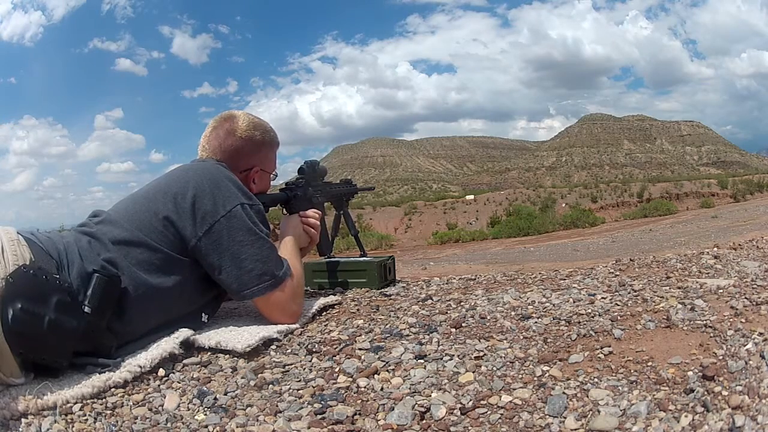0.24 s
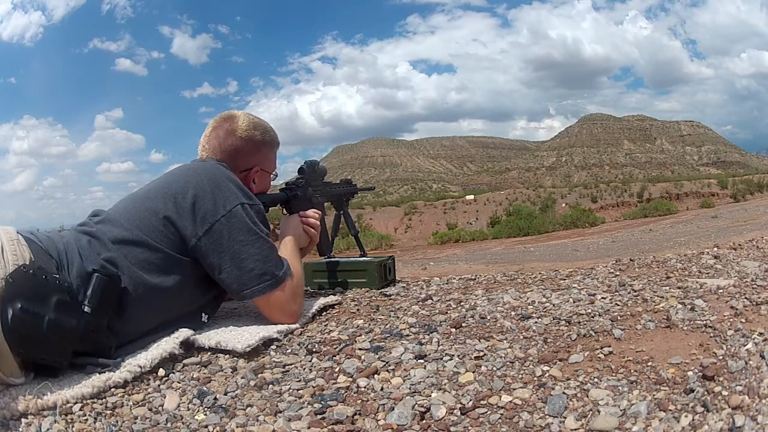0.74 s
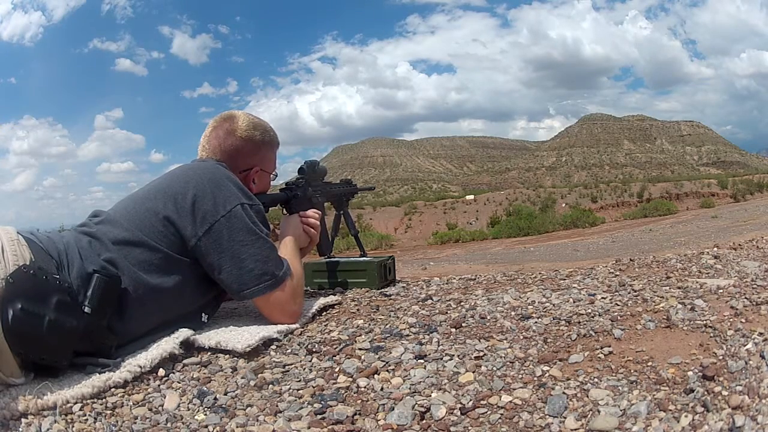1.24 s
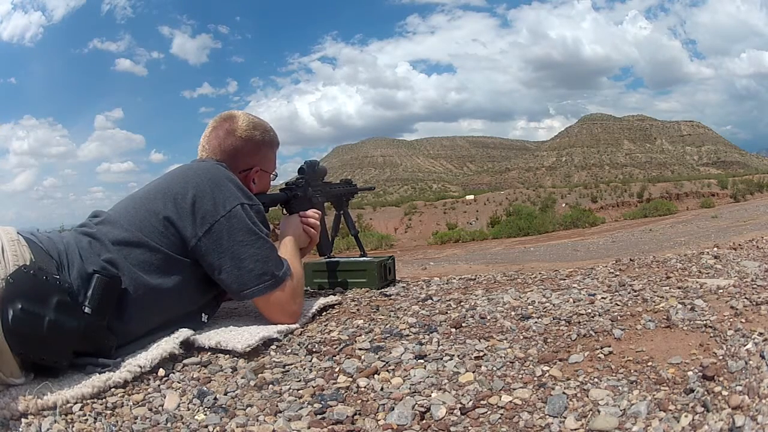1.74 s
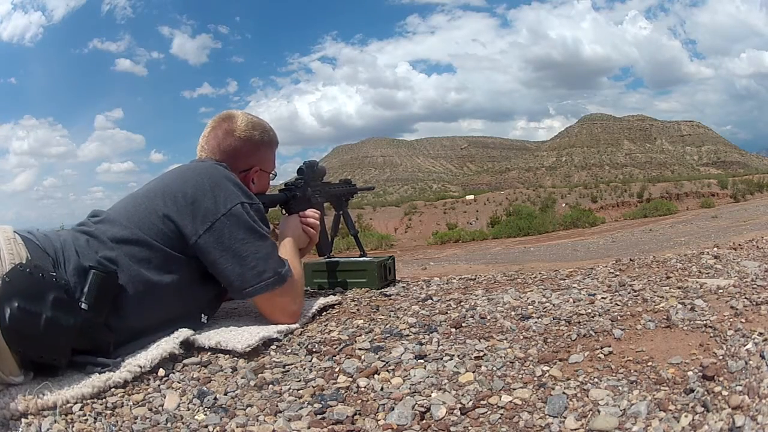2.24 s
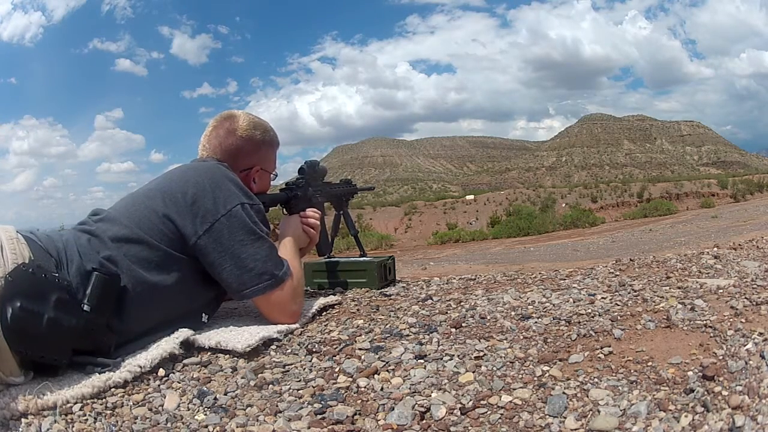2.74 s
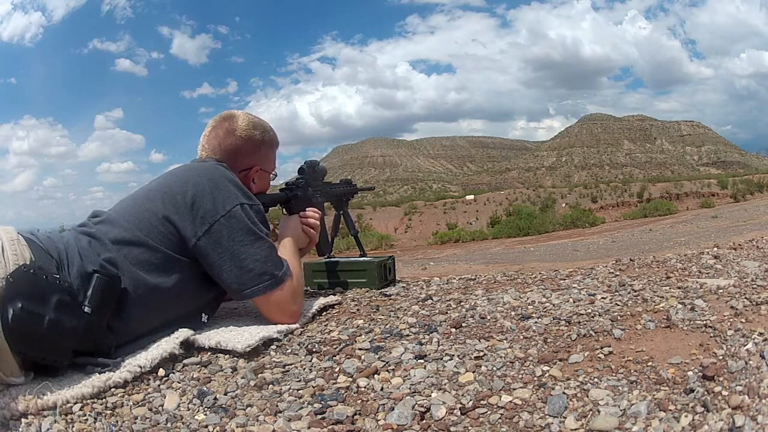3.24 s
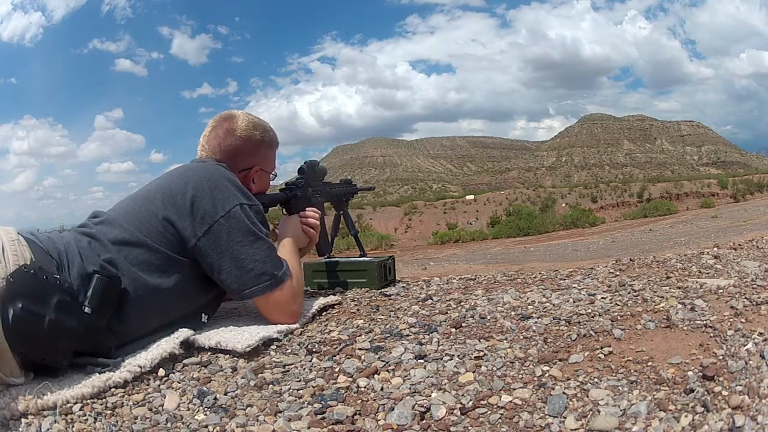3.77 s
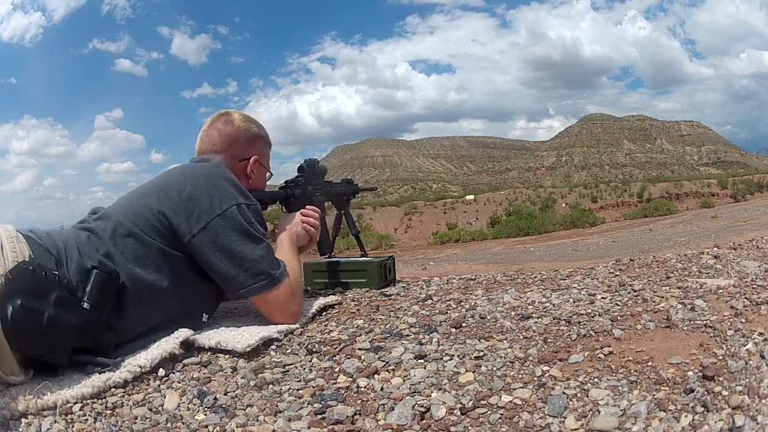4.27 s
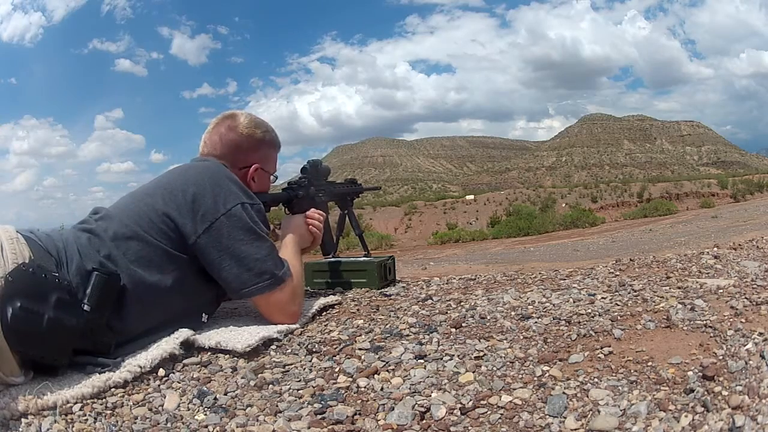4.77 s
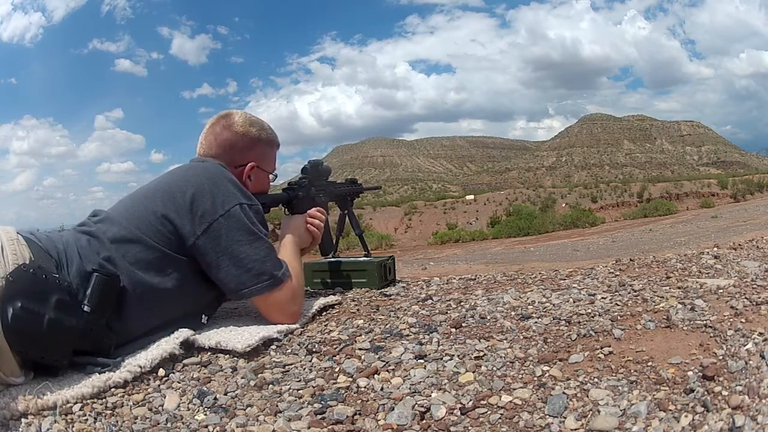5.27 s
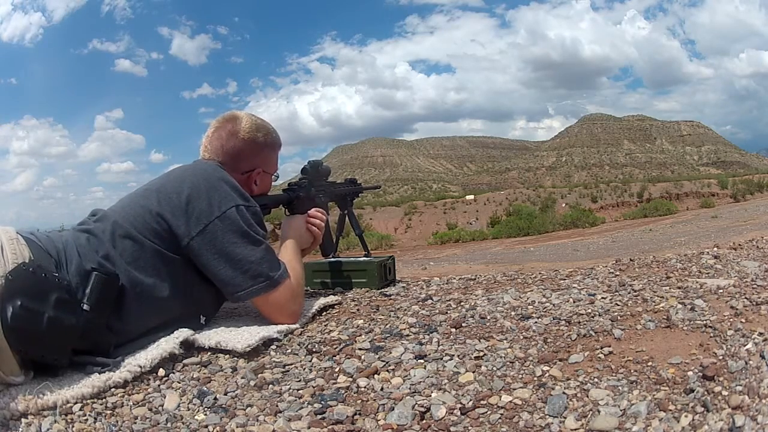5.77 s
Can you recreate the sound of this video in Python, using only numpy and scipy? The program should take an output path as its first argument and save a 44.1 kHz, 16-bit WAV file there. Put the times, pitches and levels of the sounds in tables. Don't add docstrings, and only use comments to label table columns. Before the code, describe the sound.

A small stereo microphone beside a shooter picks up low, lumpy breeze, steady hiss and the remains of a distant rolling echo. One sudden rifle blast clips harshly, with the bolt clicking and ringing inside it. A thick crashing reverberation follows within half a second, a small sharp slap returns about a second after the shot, and later soft rumbling swells fade into quiet wind.

```python
import sys
import numpy as np
from scipy import signal
from scipy.io import wavfile
from scipy.ndimage import uniform_filter1d

SR = 44100
rng = np.random.default_rng(int(sys.argv[2]) if len(sys.argv) > 2 else 0)


def to_wav(s):
    ch = np.atleast_2d(s).T
    pcm = np.round(np.clip(ch, -1, 1) * 32767)
    wavfile.write(sys.argv[1], SR, pcm.astype(np.int16))


def to_linear_factor(level_db):
    exponent = np.asarray(level_db, float) / 20
    return 10 ** exponent


N = 265041

SHOT_S, EARLIER_BY_S = 2.1823, 4.562
# (frequency [Hz], likeness [0-1])
LIKENESS = [(60, 1), (300, 0.98), (1400, .97), (3000, .9), (7000, 0.46), (15000, 0.39)]


def evened(x):
    return x / np.sqrt(np.mean(x ** 2) + 1e-20)


def read(points, hz):
    f, value = np.transpose(points)
    return np.interp(np.log(hz + 1), np.log(f + 1), value)


def add(mix, s, sound):
    part = mix[..., round(s * SR):][..., :sound.shape[-1]]
    part += sound[..., :part.shape[-1]]


def drifting(noise, bins, frames):
    return evened(uniform_filter1d(uniform_filter1d(noise, size=bins, axis=0), size=frames, axis=1))


def highpass(x, hz):
    return signal.sosfilt(signal.butter(2, hz, "high", fs=SR, output="sos"), x)


def resonate(x, hz, width):
    turn = np.exp(2j * np.pi * np.cumsum(hz * np.ones(x.shape[-1])) / SR)
    r = np.exp(-np.pi * width / SR)
    return 2 * (turn * signal.lfilter([(1 - r) ** 2], [1, -2 * r, r * r], x / turn)).real


def pair(z, same):
    same = np.clip(same, 0, 1)
    return np.array([z[0], same * z[0] + np.sqrt(1 - same ** 2) * z[1]])


def travelled(sound, s):
    travel_s = (s - SHOT_S + .02) % EARLIER_BY_S
    top_hz = np.clip(7000 / np.sqrt(travel_s), 500, 19000)
    return signal.sosfilt(signal.butter(4, top_hz, fs=SR, output="sos"), sound)


def circuit():
    # (time [s], length [s], strength [factor])
    puffs = [(0.016, .02, 0.4), (0.126, 0.028, .7), (0.153, 0.018, .5), (0.217, .015, .4),
             (0.318, .015, 0.8), (0.417, .015, .3), (0.525, 0.026, 0.7), (.63, .035, .7),
             (0.722, .015, 0.3), (0.761, .025, 1.29), (0.915, .015, 0.7)]
    second = np.arange(N) / SR % 1
    gate = sum(k * np.exp(-((second - s) / length * 2) ** 4) for s, length, k in puffs)
    hiss = to_linear_factor(-67.5) * pair(rng.standard_normal((2, N)), .2)
    bright = to_linear_factor(-80.5) * evened(np.diff(rng.standard_normal(N + 2), 2))
    buzz = to_linear_factor(-64) * gate * evened(np.diff(rng.standard_normal(N + 1)))
    return hiss + bright + buzz


def breeze():
    # (frequency [Hz], level [dB])
    air_colour = [(15, -21.5), (25, -4), (90, -2), (180, -9), (400, -14.5), (800, -26), (2200, -34),
                  (5000, -60)]
    # (time [s], level [dB])
    gusts = [(0, -56), (1.1, -56.5), (1.45, -58.5), (1.55, -57.5), (1.7, -55.5), (2.1, -58.5), (2.6, -48.5),
             (3.2, -52), (3.6, -53.5), (4.2, -53), (4.8, -55), (5.4, -57), (6.02, -57)]
    frames, hz = N // 512 + 5, np.fft.rfftfreq(2048, 1 / SR)
    a, b, c, d, lumps = rng.standard_normal((frames, 1025, 5)).T
    patches = drifting(lumps, bins=12, frames=6)
    swell = evened(uniform_filter1d(rng.standard_normal(frames), size=5))
    level_db = read(air_colour, hz)[:, None] + .8 * patches + 0.56 * swell
    z = pair(np.array([a + 1j * b, c + 1j * d]), .7) * to_linear_factor(level_db)
    air = evened(signal.istft(z, nperseg=2048, noverlap=1536)[1][:, :N])
    return to_linear_factor(np.interp(np.arange(N) / SR, *np.transpose(gusts))) * air


def facets(count):
    per_s, spread_db = 5000, 2
    size = to_linear_factor(spread_db * np.minimum(rng.exponential(1, (2, count)), 5))
    sign = rng.choice([-1., 1.], (2, count))
    return evened(size * sign * (rng.random((2, count)) < per_s / SR))


def returns(rows, colour, turn_hz, hz, t):
    edge_db, edge_power = 8.5, 1.5
    s, swell, fade, db, bright_db = np.transpose(rows)[..., None]
    away = np.maximum((s - t) / np.maximum(swell, .003), (t - s) / np.maximum(fade, .003))
    octaves = np.clip(np.log2((hz + 1) / turn_hz), -2, 2)
    tint_db = read(colour, hz) + bright_db * octaves
    return to_linear_factor(2 * tint_db).T @ to_linear_factor(2 * (db - edge_db * away ** edge_power))


def roll(taps):
    # (nearest [s], swell [s], fade [s], level [dB], brightness [dB per octave])
    slopes = [(2.26, 0.012, .05, -37, -.5), (2.32, 0.04, 0.14, -34.5, .5), (2.43, 0.026, 0.14, -28.5, -1.5),
              (2.53, 0.019, 0.016, -18, -1), (2.57, 0.16, .11, -24.5, .5), (2.73, .06, 0.17, -42.5, 0),
              (2.89, .1, 0.095, -46, -5), (3.03, 0.059, 0.18, -49.5, 2.5), (3.29, 0.021, 0.087, -51, 4),
              (3.48, 0.24, 0.094, -56.5, 2), (3.72, .1, 0.11, -60, 5), (3.64, 0.023, 0.029, -50.5, 3),
              (3.88, .075, .1, -40.5, 0.5), (3.98, 0.047, 0.11, -41, -1), (4.22, 0.091, 0.18, -41, .5),
              (4.42, 0.076, 0.103, -40.5, -.5), (4.49, .06, 0.03, -47.5, -2), (4.65, .1, 0.19, -54, 1),
              (4.81, 0.11, 0.37, -46.5, .5), (5.05, 0.087, 0.16, -47.5, 0.5),
              (5.21, 0.091, 0.16, -48.5, 0.5), (5.39, 0.11, 0.2, -51.5, 0.5), (5.6, .2, 0.02, -56.5, 0),
              (5.75, .15, 0.25, -82, -8)]
    # (nearest [s], swell [s], fade [s], level [dB], brightness [dB per octave])
    bushes = [(2.27, 0.045, .1, -44, .5), (2.34, .05, 0.059, -39.5, 0), (2.39, .012, .05, -29.5, 1.5),
              (2.43, 0.027, 0.076, -26, 1), (2.52, .08, 0.12, -30, 0), (2.7, .05, 0.26, -47.5, -4.5),
              (2.79, 0.046, 0.065, -47.5, -6), (2.92, .08, .08, -45, -4), (3.07, 0.093, 0.12, -53, -5),
              (3.21, 0.056, 0.072, -48.5, 2), (3.293, .006, 0.0083, -32.5, 3),
              (3.3, 0.055, 0.038, -42, 3.5), (3.38, .05, 0.063, -50.5, -4.5),
              (3.49, 0.049, 0.067, -48, -3.5), (3.58, 0.094, 0.089, -46, -5),
              (3.74, 0.064, 0.17, -53.5, -6.5), (3.88, .07, 0.091, -54, -6.5), (4.08, .1, 0.089, -51, -10),
              (4.22, 0.075, .06, -50.5, -3), (4.62, 0.063, .15, -59, 3)]
    # (frequency [Hz], density [dB per Hz])
    blast_colour = [(160, 13), (320, 15.5), (560, 16), (850, 10), (1250, 9), (2200, 1), (4500, -7),
                    (12000, -10)]
    # (frequency [Hz], density [dB per Hz])
    crack_colour = [(160, -26), (460, -7.5), (1600, 9), (4500, 9), (7500, 9.5), (12000, 6.5)]
    # (frequency [Hz], level [dB])
    ground_colour = [(85, -34.5), (140, -3), (240, 4), (700, 3), (950, -0.5), (3200, 1), (10500, -9),
                     (15000, -30.5)]
    hz, t, z = signal.stft(taps, SR, nperseg=1024, noverlap=896)
    blast = returns(slopes, blast_colour, 460, hz, t)
    crack = returns(bushes, crack_colour, 3000, hz, t)
    loss_db = 21 * np.maximum(hz / 4500 - 1, 0) ** 1.5 + 6.5 * np.minimum(hz / 4500, 1)
    air_db = np.outer(loss_db, np.maximum(t - SHOT_S, 0))
    clumps = drifting(rng.standard_normal(z.shape[1:]), bins=9, frames=10)
    tint_db = 1.1 * clumps + read(ground_colour, hz)[:, None] - air_db
    z = pair(z, read(LIKENESS, hz)[:, None]) * np.sqrt(blast + crack) * to_linear_factor(tint_db)
    return signal.istft(z, SR, nperseg=1024, noverlap=896)[1][:, :N]


def hillside():
    still = 0.47
    taps = facets(N)
    out = roll(taps)
    earlier = roll(still * taps + np.sqrt(1 - still ** 2) * facets(N))
    add(out, 0, to_linear_factor(-0.5) * earlier[:, round(EARLIER_BY_S * SR):])
    return out


def rings(rows, rise_share=0):
    out, ms = np.zeros((2, N)), np.arange(8000) * 1000 / SR
    for s, db, hz, width, t60 in rows:
        rise = 1.2 + 500 / width + rise_share * t60
        ring = evened(resonate(pair(rng.standard_normal((2, 8000)), read(LIKENESS, hz)), hz, width))
        fade_out = 1 - (ms / ms[-1]) ** 4
        envelope = fade_out * np.minimum(ms / rise, 1) * to_linear_factor(db - 60 * ms / t60)
        add(out, s, travelled(ring * envelope, s))
    return out


def far_ground():
    # (time [s], level [dB rms], frequency [Hz], width [Hz], t60 [ms])
    far_returns = [
        (1.68, -65, 1300, 2100, 510),
        (4.57, -63.5, 3470, 700, 197),
    ]
    return rings(far_returns, rise_share=0.1)


def hard_faces():
    # (time [s], level [dB rms], frequency [Hz], width [Hz], t60 [ms])
    slaps = [(.988, -48, 600, 110, 120), (2.2185, -18, 330, 120, 110), (2.3797, -52, 14000, 3000, 40),
             (2.3807, -21, 7500, 3500, 18), (2.419, -21, 1230, 270, 49), (2.497, -15, 170, 20, 400),
             (2.642, -22, 175, 50, 200), (2.798, -46, 5500, 3000, 30), (2.945, -46, 4300, 3000, 30),
             (3.186, -42, 4600, 900, 30), (3.2083, -40, 4000, 3800, 30), (3.2885, -31, 2000, 2800, 36),
             (3.2948, -35, 1190, 1600, 70), (3.3218, -42, 1810, 2500, 60), (3.535, -40, 500, 399, 45),
             (3.615, -40, 1094, 900, 38), (3.629, -28, 440, 110, 60), (4.224, -49, 1500, 2500, 60)]
    return rings(slaps)


def action():
    # (time [s], level [dB rms], frequency [Hz], width [Hz], t60 [ms])
    clatter = [
        (2.1772, -18, 4800, 7400, 32),
        (2.1896, -19, 3000, 4600, 22),
        (2.191, -17.5, 650, 900, 140),
        (2.195, -33.5, 3000, 3800, 110),
        (2.2175, -26, 8500, 4500, 45),
        (2.218, -28, 3500, 3500, 110),
        (2.2195, -21, 520, 450, 150),
        (2.228, -31, 7400, 5000, 40),
        (2.2365, -21, 7200, 3000, 35),
    ]
    return rings(clatter)


def pressure_pulses():
    # (time [s], peak [dB], length [ms], sign)
    pulses = [(2.1824, 5, .45, 1), (2.1834, 9, .55, 1), (2.1882, 7, .3, 1), (2.1894, 7, .45, 1),
              (2.1946, -14, .3, -1), (2.218, 2, .6, -1), (2.2208, -10, .8, -1), (2.2319, -11, .6, 1),
              (2.4235, -15, .3, 1), (2.4665, -16, .3, 1), (2.4975, -10, .35, 1), (2.5175, -8, .6, 1),
              (2.5315, -5, .55, -1), (2.5635, -10, .5, -1), (2.6405, -13, .45, 1), (3.2893, -27, .12, 1),
              (3.2903, -26, .12, -1), (3.2957, -25, .14, 1)]
    out, ms = np.zeros((2, N)), np.arange(900) * 1000 / SR
    for s, db, length, sign in pulses:
        u = ms / length
        onset = np.sin(np.pi / 2 * np.minimum(u / 0.42, 1)) ** 2
        pulse = 2 * (1 - u) * np.exp(-.75 * u) * onset
        add(out, s, sign * to_linear_factor(db) * travelled(pulse, s))
    return out


def gas_jet():
    out = np.zeros((2, N))
    start_ms, end_ms = .9, 6.6
    span = round((end_ms - start_ms) * SR / 1000)
    for db, hz, width in (10, (6300, 3300), 3600), (6.5, (1400, 775), 800):
        noise = pair(rng.standard_normal((2, span)), 0.65)
        jet = evened(resonate(noise, np.linspace(*hz, span), width))
        add(out, SHOT_S + start_ms / 1000, to_linear_factor(db) * jet * signal.windows.tukey(span, .3))
    return out


def rifle():
    muzzle = highpass(pressure_pulses() + gas_jet(), 240)
    return highpass(muzzle + action() + hard_faces() + far_ground(), 110)


def scene():
    return rifle() + hillside() + breeze()


def top_cut(x):
    return signal.sosfilt(signal.butter(12, 15330, fs=SR, output="sos"), x)


def record(dry):
    ceiling, top_hz = .88, 15600
    right = to_linear_factor(-.7) * signal.lfilter(*signal.butter(1, 125, "high", fs=SR), dry[1])
    x = np.clip(np.array([dry[0], right]) + circuit(), -ceiling, ceiling)
    x = signal.oaconvolve(x, signal.firwin(101, top_hz, fs=SR)[None], "same")
    return top_cut(x)


dry = scene()
out = record(dry)
to_wav(out)
```